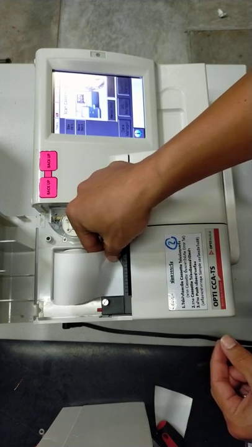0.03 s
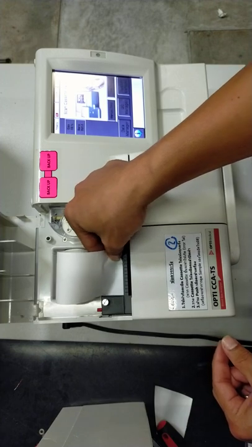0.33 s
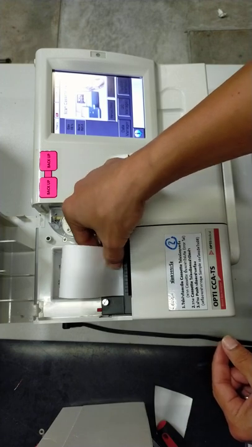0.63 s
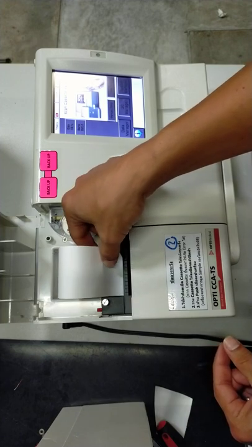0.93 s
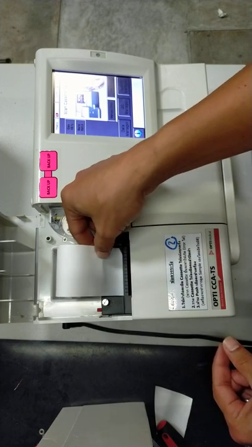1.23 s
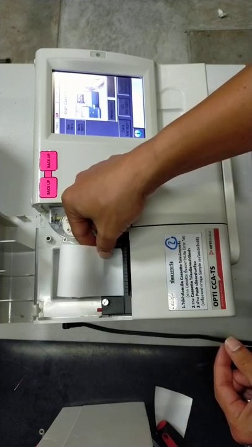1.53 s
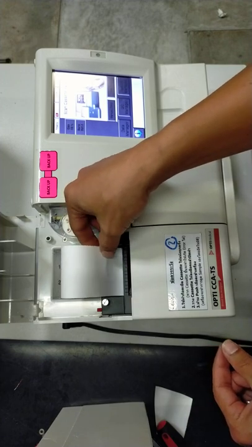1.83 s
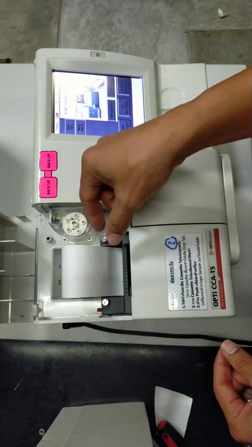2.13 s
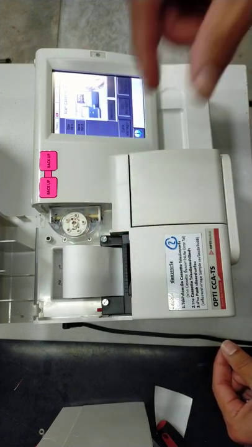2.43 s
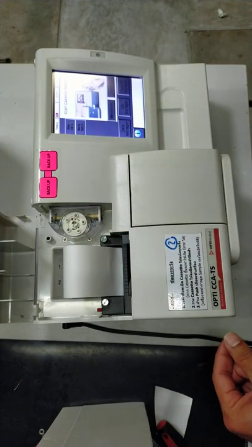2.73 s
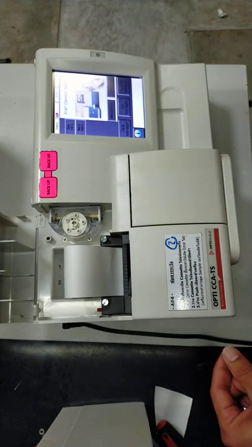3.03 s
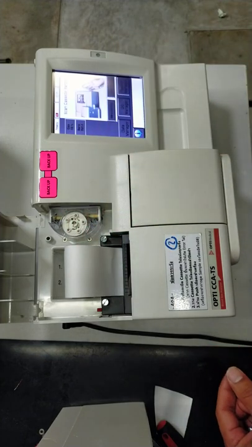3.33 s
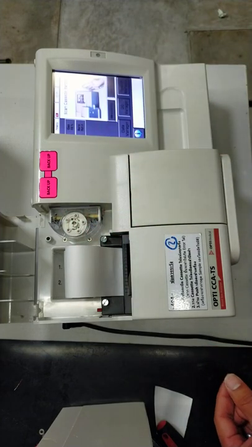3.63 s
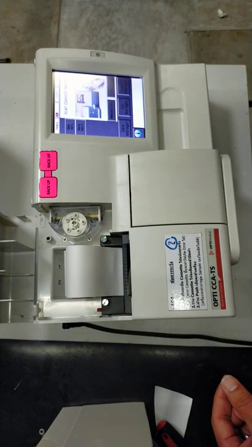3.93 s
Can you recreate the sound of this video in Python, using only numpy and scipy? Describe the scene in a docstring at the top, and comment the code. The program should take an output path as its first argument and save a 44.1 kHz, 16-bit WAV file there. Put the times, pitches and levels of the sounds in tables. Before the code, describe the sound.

Light plastic clacks, a brief finger scrape on a paper roll and faint rustles are scattered over the low hum and fan rush of indoor equipment. A sharp, much louder knock on a small casing follows, very close.

```python
"""A hard-walled room: a bench instrument with an open printer bay, mains hum over a steady fan rush.
Fingers scrape the paper roll once, a run of tiny slips, and leave it with a tick on plastic.
Small hard clacks and soft rustles fade into the room.
Near the end a sharp knock rings a small casing right at the microphone."""
import sys
import numpy as np
from scipy import signal
from scipy.fft import rfft, irfft, next_fast_len
from scipy.io import wavfile
from scipy.ndimage import map_coordinates

SR = 44100
rng = np.random.default_rng(int(sys.argv[2]) if len(sys.argv) > 2 else 0)


def to_wav(sig):
    """Store sig (one row per channel, or 1-D mono) as 16-bit WAV at the path in sys.argv[1].

    Samples outside -1..1 are clipped; the rate is SR.
    """
    pcm = np.clip(np.atleast_2d(sig), -1, 1) * 32767
    pcm = np.round(pcm).astype(np.int16)
    wavfile.write(sys.argv[1], SR, pcm.T)  # frames by channels


N = 176400

# knock contacts: start_s, thump_db, crack_db
KNOCK_CONTACTS = [(3.8684, -45, -30.5), (3.8691, -15, -32.5), (3.8724, -49, -37)]
# casing modes: pitch_hz, level_db, t60_s
CASING_MODES = [(154.3, -18, 0.12), (314.6, -17, 0.16), (444, -7, 0.054), (561, 3.5, 0.022),
                (1166, -11, 0.028), (1390, 3, 0.009), (1636, -6.5, 0.013), (1880, -4.5, 0.0062)]
# knock crack spectrum: freq_hz, gain_db
CRACK_SPECTRUM = [(300, -29), (1000, 1), (1500, 13), (2600, 5), (3500, -4), (5000, 0.5), (6100, -13),
                  (8500, 4.5), (10200, -2.5), (12000, -22), (15000, -1), (16000, -11)]
# paper roll response: freq_hz, gain_db
PAPER_SPECTRUM = [(150, 3.5), (600, -8), (1150, 4), (1400, -2.5), (1780, 5.5), (2150, -9), (2700, -2.5),
                  (4500, -18), (5300, -11.5), (6200, -21), (7700, -9.5), (8350, 0.5), (8750, -13),
                  (9100, 0.5), (9600, -12), (12200, -22), (15500, -21)]
# contacts on plastic: start_s, level_db
TICK_CONTACTS = [(2.0148, -45), (2.017, -57), (3.856, -50.5)]
# plastic response: freq_hz, gain_db
TICK_SPECTRUM = [(200, -26), (900, -9), (1400, 9.5), (2100, -12), (2650, 2), (3050, -6), (3450, -3),
                 (4000, -10), (5500, -10), (6400, -20), (7900, -8), (10500, -27), (15500, -17)]
# hard clacks: start_s, ring_db, body_db, ring_t60_s
CLACK_HITS = [(.025, -61, -50, 0.37), (0.133, -59, -53.5, 0.28), (0.214, -58, -52.5, 0.31),
              (0.666, -67, -51.5, 0.43), (1.311, -77, -57.5, 0.28), (1.365, -69, -57.5, 0.28),
              (2.303, -65.5, -65, 0.49), (2.341, -58.5, -53.5, 0.24), (2.417, -60, -66, 0.098),
              (2.462, -65, -65, 0.14), (2.502, -52.5, -46.5, 0.27), (3.581, -66, -56, 0.34),
              (3.69, -70.5, -63, 0.18)]
# bright clack ring: freq_hz, gain_db
RING_SPECTRUM = [(500, -22), (1700, -7), (2350, -9.5), (2800, 1.5), (3200, -12), (3550, -8), (3950, -34),
                 (4250, -17), (4750, -29), (5150, -20.5), (6200, -46), (7450, -23.5), (10000, -39.5),
                 (16000, -37)]
# hollow clack body: freq_hz, gain_db
BODY_SPECTRUM = [(200, -32), (650, -1), (900, -3.5), (1170, 7), (1450, -6.5), (1900, -5), (2400, -18),
                 (3500, -15), (4500, -36), (16000, -58)]
# papery brushes: start_s, level_db, rise_s, t60_s
RUSTLE_STROKES = [(.532, -54, 0.0018, 0.41), (.77, -64, 0.0077, 0.22), (1.733, -62.5, .004, 0.38),
                  (1.825, -67.5, .008, 0.29), (3.038, -64.5, 0.0028, 0.26), (3.125, -64.5, 0.0028, 0.21)]
# rustle spectrum: freq_hz, gain_db
RUSTLE_SPECTRUM = [(300, -14), (1100, -1), (1400, -3), (1950, 1), (2850, 0), (3500, -7), (3850, -19),
                   (4120, -10), (4750, -34), (6200, -32), (8300, -31), (16000, -43)]
# mains harmonics: pitch_hz, level_db
HUM_HARMONICS = [(100, -65.5), (300, -50), (400, -62), (500, -70), (700, -76), (800, -72), (900, -93),
                 (1100, -78), (1300, -93.5), (1400, -78), (1600, -83.5), (1700, -81)]
# fan rumble: freq_hz, gain_db
RUMBLE_SPECTRUM = [(25, -44), (42, -29), (65, -24), (80, -12.5), (95, 6), (120, 1.5), (148, 2), (185, -0.5),
                   (260, -2.5), (302, 6.5), (335, 1.5), (400, 2), (470, -8.5), (560, -16.5), (800, -48)]
# fan air hiss: freq_hz, gain_db
AIR_SPECTRUM = [(300, 6.5), (520, -5.5), (660, 8), (780, -4), (920, 1.5), (1100, 2), (1600, -5.5),
                (2200, -14), (2650, -11), (3300, -22), (4800, -25.5), (6200, -57.5), (8300, -40),
                (11500, -49.5), (15500, -21)]
# room decay: freq_hz, t60_s
ROOM_DECAY = [(200, 0.37), (2000, .3), (2700, 0.36), (3600, 0.43), (6500, 0.35), (8250, 0.4), (10000, 0.19),
              (14000, 0.26)]


def amp(db):
    """Decibels to gain."""
    return 10 ** (np.asarray(db) / 20)


def unit_rms(x):
    """Scale to rms 1."""
    return x / np.sqrt(np.mean(x ** 2) + 1e-20)


def log_interp(points, hz):
    """Interpolate (freq_hz, value) points on a log frequency axis."""
    freq_hz, values = np.transpose(points)
    return np.interp(np.log(hz + 1), np.log(freq_hz + 1), values)


def since(start_s):
    """Seconds since start_s, zero before."""
    return np.maximum(np.arange(N) / SR - start_s, 0)


def wobble(rate_hz):
    """Smooth random curve, rate_hz knots a second."""
    return map_coordinates(rng.standard_normal(1024), [np.arange(N) * rate_hz / SR], mode="wrap")


def filtered(x, response):
    """Zero-phase filter with gain response(hz)."""
    size = next_fast_len(N + SR // 2)
    return irfft(rfft(x, size) * response(np.fft.rfftfreq(size, 1 / SR)), size)[:N]


def noise(spectrum):
    """Coloured noise, rms 1."""
    return unit_rms(filtered(rng.standard_normal(N), lambda hz: amp(log_interp(spectrum, hz))))


def resonate(force, spectrum, size=4096):
    """Drive a minimum-phase body of unit energy."""
    gain = amp(log_interp(spectrum, np.fft.rfftfreq(size, 1 / SR)))
    cepstrum = irfft(np.log(gain))
    cepstrum[1:size // 2] *= 2
    cepstrum[size // 2 + 1:] = 0
    impulse = irfft(np.exp(rfft(cepstrum)))
    return signal.fftconvolve(force, impulse / np.linalg.norm(impulse))[:N]


def in_room(x, wet_db):
    """Add a room tail with frequency-dependent decay."""
    hz, time_s, bands = signal.stft(rng.standard_normal(SR // 2), SR, nperseg=256)
    decay = amp(-60 * time_s / log_interp(ROOM_DECAY, hz)[:, None])
    tail = signal.istft(bands * decay, SR, nperseg=256)[1]
    return x + amp(wet_db) * signal.fftconvolve(x, tail / np.linalg.norm(tail))[:N]


def strike(start_s, rise_s, t60_s):
    """Impact envelope: exponential rise and decay."""
    age_s = since(start_s)
    return (1 - np.exp(-age_s / rise_s)) * np.exp(-np.log(1000) * age_s / t60_s)


def knock(mode_rise_cycles=0.29, contact_cutoff_hz=2290):
    """Three blunt contacts ring a small casing, low modes rising slowest; each adds a bright crack."""
    modes = np.zeros(N)
    crack_envelope = np.zeros(N)
    for start_s, thump_db, crack_db in KNOCK_CONTACTS:
        for pitch_hz, level_db, t60_s in CASING_MODES:
            envelope = amp(thump_db + level_db) * strike(start_s, mode_rise_cycles / pitch_hz, t60_s)
            modes += envelope * np.sin(2 * np.pi * pitch_hz * since(start_s))
        crack_envelope += amp(crack_db) * strike(start_s, rise_s=0.0001, t60_s=0.0086)
    thump = signal.sosfilt(signal.butter(4, contact_cutoff_hz, fs=SR, output="sos"), modes)
    crack = resonate(crack_envelope * rng.standard_normal(N), CRACK_SPECTRUM)
    return in_room(crack - thump, wet_db=-30)


def paper_scrape(start_s=0.232, length_s=0.032, edge_s=0.0013, level_db=-47.5,
                 slips_per_s=570, scatter_db=2):
    """Tiny slips and smooth friction, in equal parts, drive the paper roll."""
    slips = (rng.random(N) < slips_per_s / SR) * amp(scatter_db * rng.standard_normal(N))
    friction = rng.standard_normal(N)
    stroke = (1 - np.exp(-since(start_s) / edge_s)) * np.exp(-since(start_s + length_s) / edge_s)
    force = stroke * unit_rms(unit_rms(slips) + friction)
    return in_room(amp(level_db) * resonate(force, PAPER_SPECTRUM), wet_db=-11)


def ticks(rise_s=0.0001, t60_s=0.019):
    """Light contacts excite plastic with short noise bursts."""
    envelope = sum(amp(level_db) * strike(start_s, rise_s, t60_s) for start_s, level_db in TICK_CONTACTS)
    return in_room(resonate(envelope * rng.standard_normal(N), TICK_SPECTRUM), wet_db=-10.5)


def clacks(rise_s=0.0012, body_lag_s=0.0039, resonance_hz=2695, width_hz=460,
           snap_db=1.5, linger_db=-5.5, linger_t60_ratio=1.76):
    """Room-blurred clacks: a bright ring, one resonance that snaps and lingers, then a hollow body."""
    def band(hz):
        return 1 / (1 + ((hz - resonance_hz) / width_hz) ** 4)

    out = np.zeros(N)
    for start_s, ring_db, body_db, ring_t60_s in CLACK_HITS:
        snap = amp(snap_db) * strike(start_s, rise_s, t60_s=0.022)  # direct sound, ahead of the room
        linger = amp(linger_db) * strike(start_s, rise_s, linger_t60_ratio * ring_t60_s)
        resonance = unit_rms(filtered(rng.standard_normal(N), band))
        ring = strike(start_s, rise_s, ring_t60_s) * noise(RING_SPECTRUM)
        body = strike(start_s + body_lag_s, rise_s=0.0029, t60_s=0.21) * noise(BODY_SPECTRUM)
        out += amp(ring_db) * (ring + (snap + linger) * resonance) + amp(body_db) * body
    return out


def rustles():
    """Soft papery brushes: noise bursts fading into the room."""
    envelope = sum(amp(level_db) * strike(start_s, rise_s, t60_s)
                   for start_s, level_db, rise_s, t60_s in RUSTLE_STROKES)
    return envelope * noise(RUSTLE_SPECTRUM)


def mains_hum(initial_db=-6.5, full_at_s=0.26, swell_s=0.022,
              waver_db=1, waver_rad=0.14, waver_hz=6.266):
    """Mains harmonics wavering in level and phase; soft at first, then a quick swell to full."""
    time_s = since(0)
    swell = amp(initial_db * np.clip((full_at_s - time_s) / swell_s, 0, 1))
    out = np.zeros(N)
    for pitch_hz, level_db in HUM_HARMONICS:
        peak = np.sqrt(2) * amp(level_db + waver_db * wobble(waver_hz))
        phase_rad = 2 * np.pi * (pitch_hz * time_s + rng.random())
        out += peak * np.sin(phase_rad + waver_rad * wobble(waver_hz))
    return swell * out


def fan(rumble_db=-49.5, air_db=-61.5):
    """Steady rumble with a thin hiss of air."""
    return amp(rumble_db) * noise(RUMBLE_SPECTRUM) + amp(air_db) * noise(AIR_SPECTRUM)


def scene():
    """Mono sum of all sources."""
    return (mains_hum() + fan() + clacks() + rustles() + paper_scrape() + ticks() + knock())[None]


def record(dry, low_cut_hz=78, band_limit_hz=15800):
    """Microphone: bass roll-off and a hard upper band limit."""
    thinned = signal.sosfilt(signal.butter(4, low_cut_hz, "highpass", fs=SR, output="sos"), dry[0])
    return filtered(thinned, lambda hz: hz < band_limit_hz)[None]


dry = scene()
out = record(dry)
to_wav(out)
```